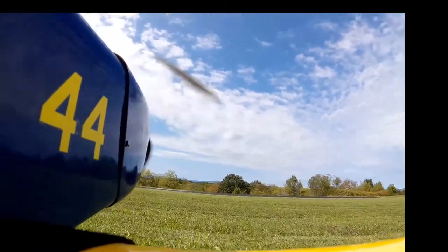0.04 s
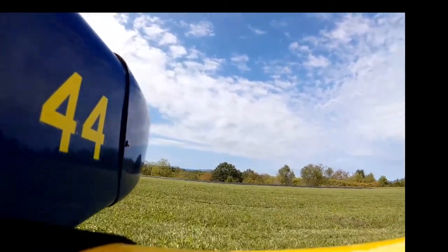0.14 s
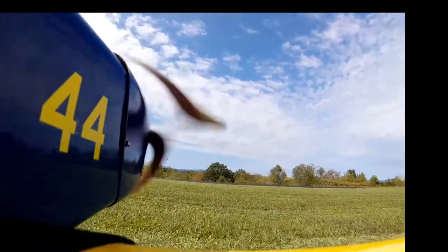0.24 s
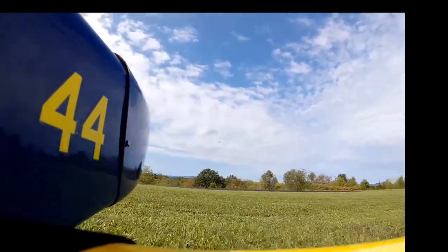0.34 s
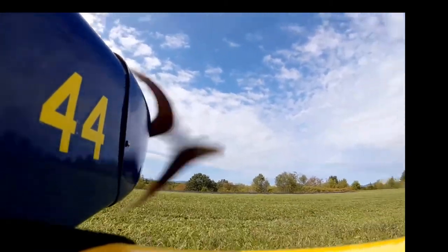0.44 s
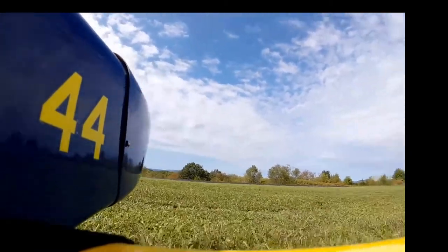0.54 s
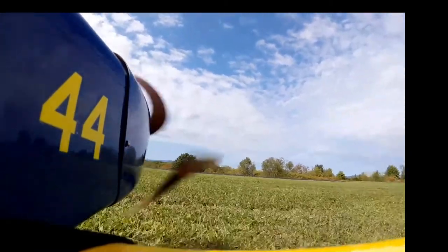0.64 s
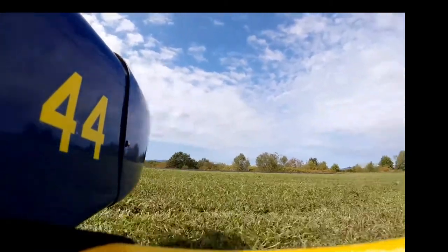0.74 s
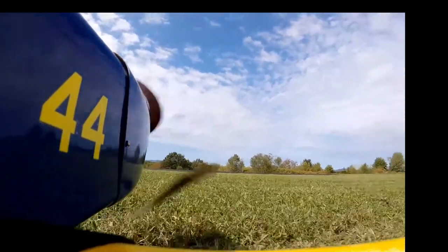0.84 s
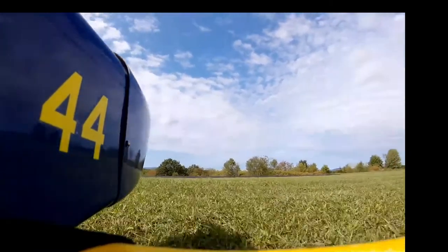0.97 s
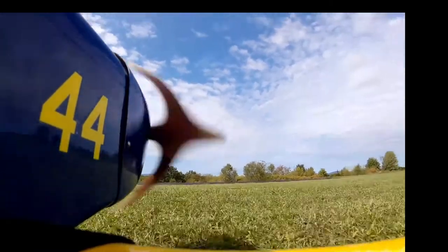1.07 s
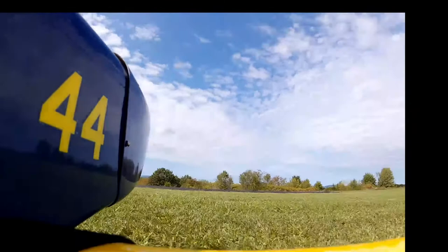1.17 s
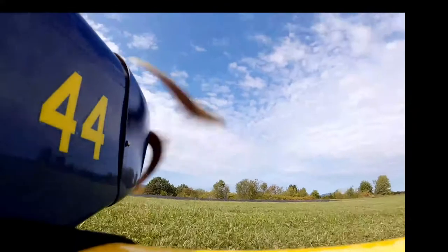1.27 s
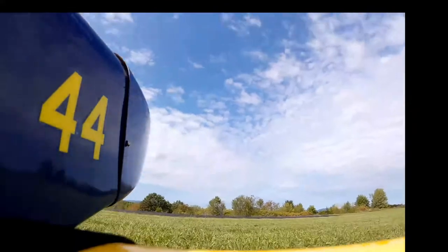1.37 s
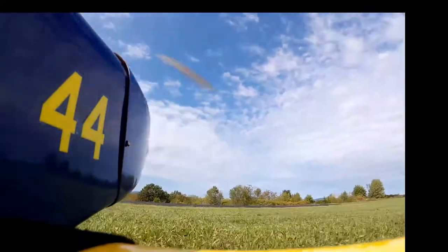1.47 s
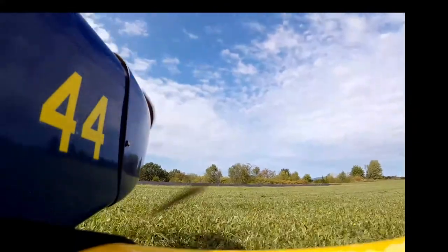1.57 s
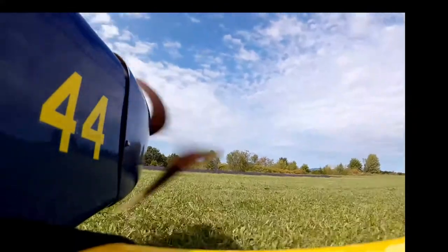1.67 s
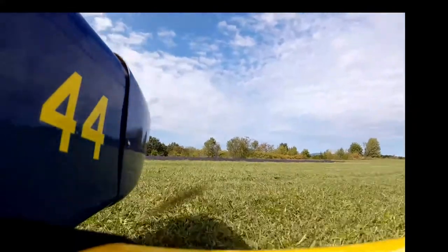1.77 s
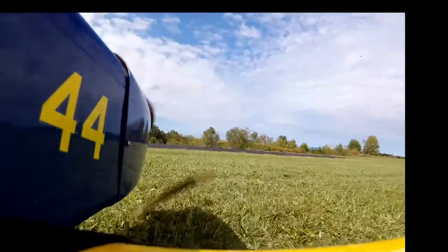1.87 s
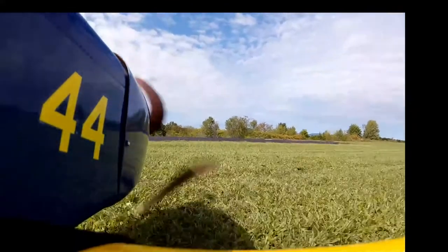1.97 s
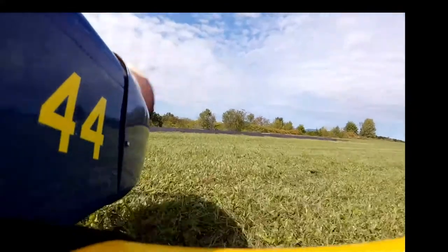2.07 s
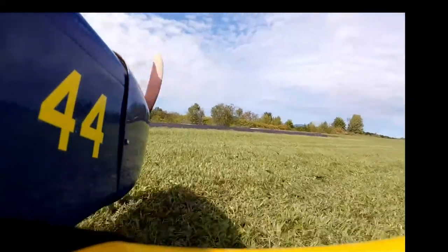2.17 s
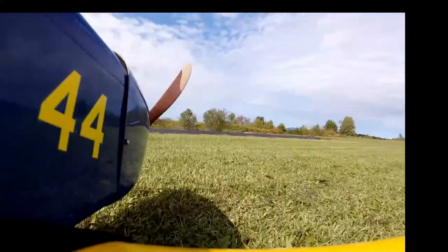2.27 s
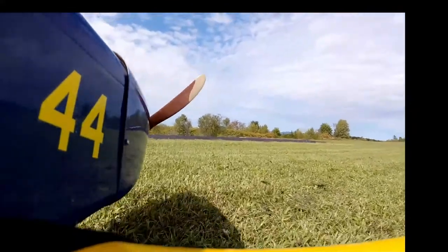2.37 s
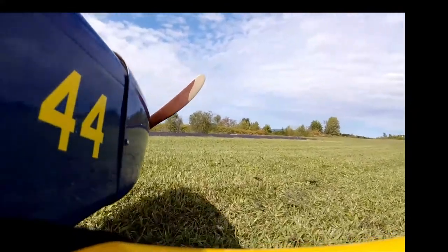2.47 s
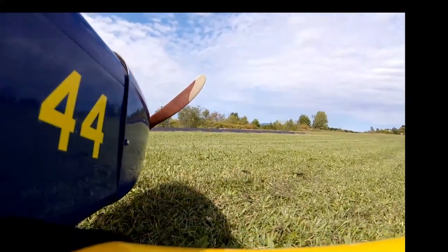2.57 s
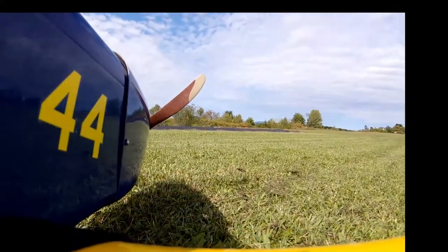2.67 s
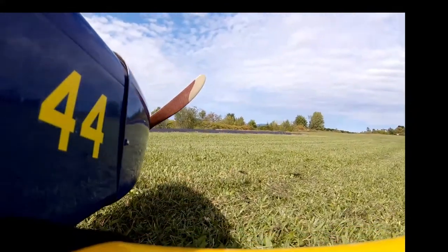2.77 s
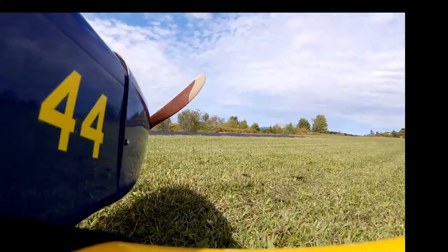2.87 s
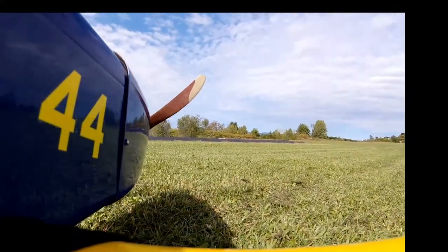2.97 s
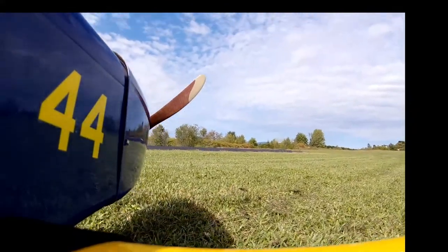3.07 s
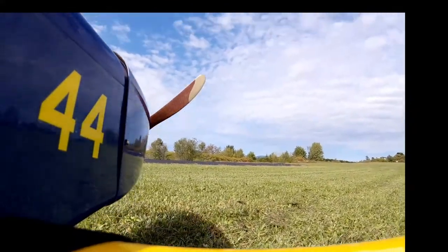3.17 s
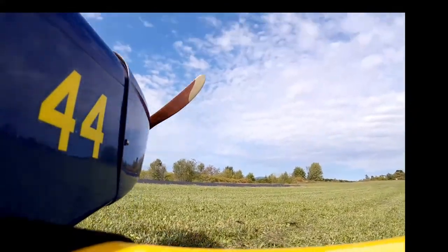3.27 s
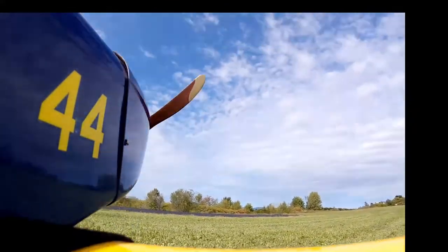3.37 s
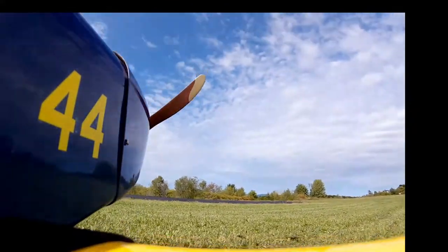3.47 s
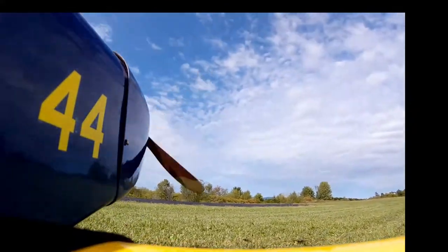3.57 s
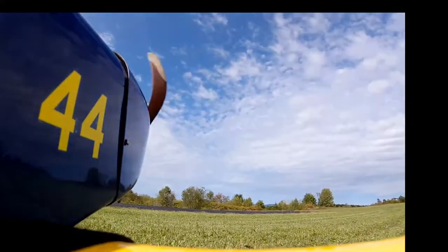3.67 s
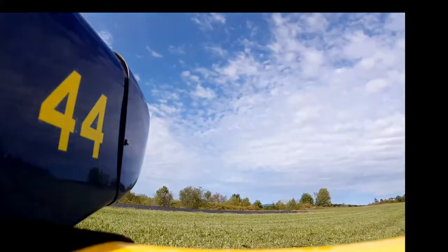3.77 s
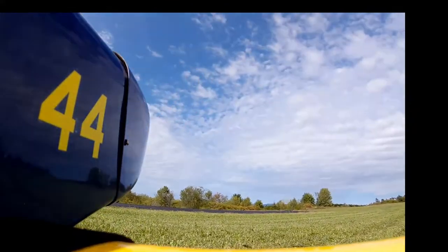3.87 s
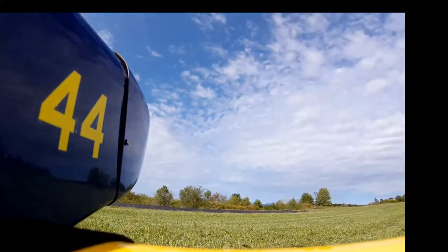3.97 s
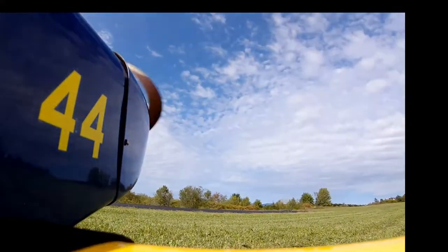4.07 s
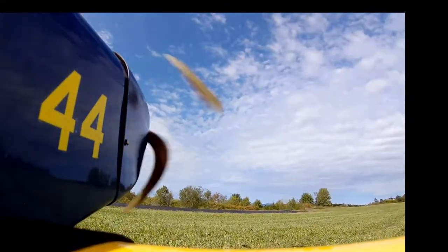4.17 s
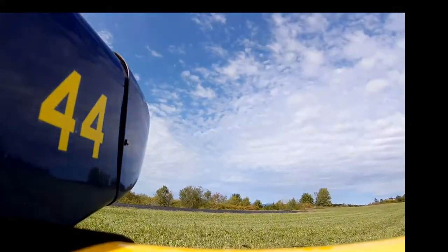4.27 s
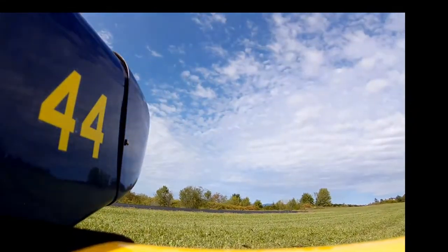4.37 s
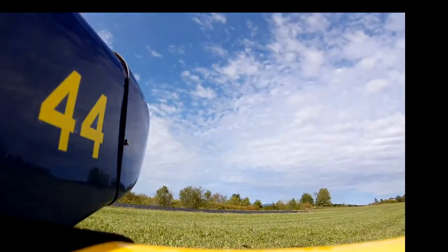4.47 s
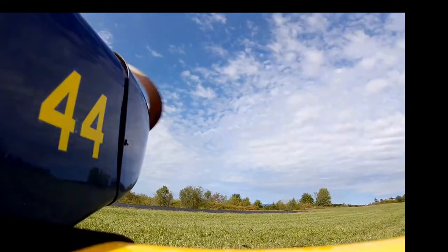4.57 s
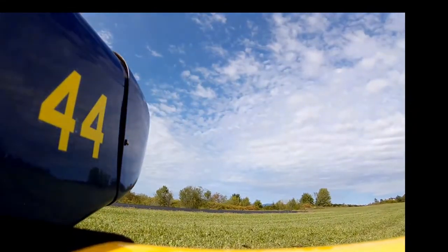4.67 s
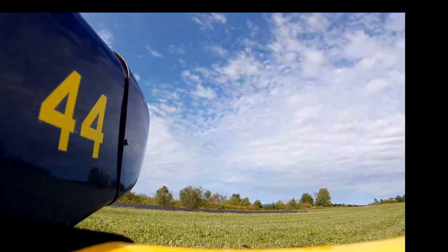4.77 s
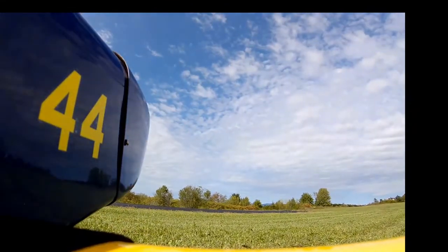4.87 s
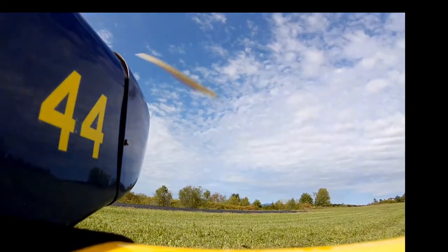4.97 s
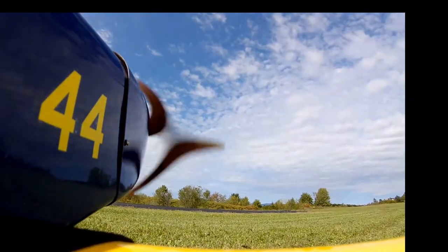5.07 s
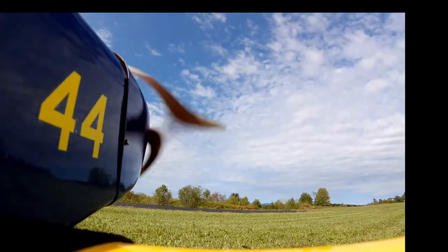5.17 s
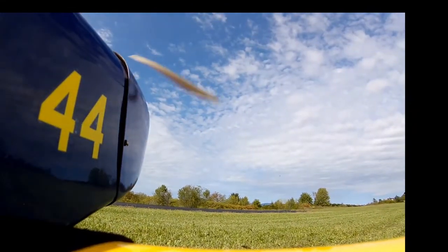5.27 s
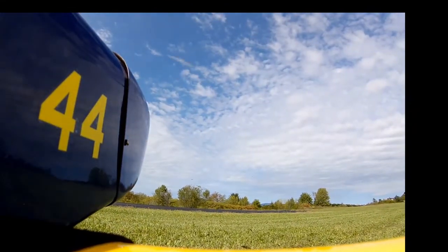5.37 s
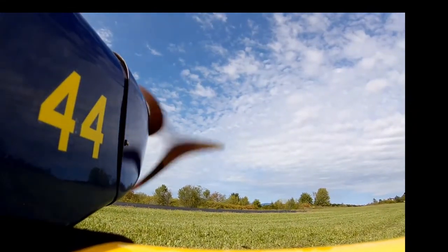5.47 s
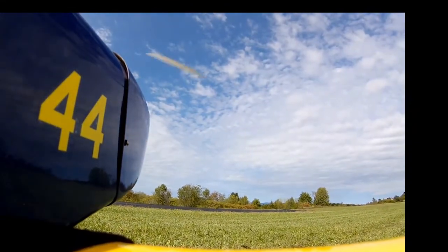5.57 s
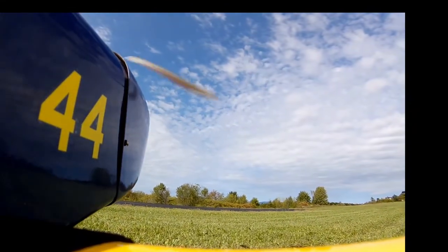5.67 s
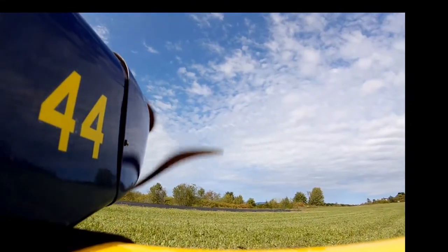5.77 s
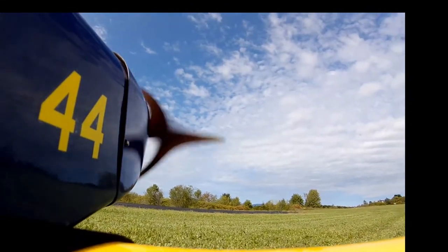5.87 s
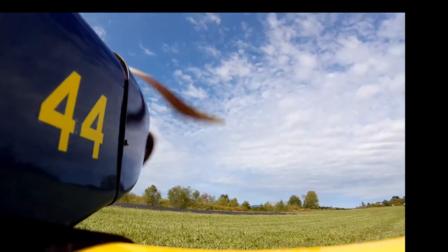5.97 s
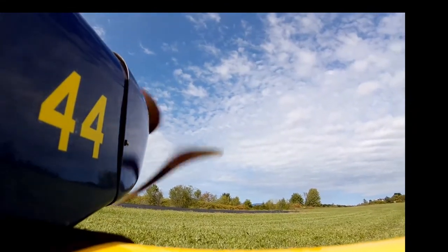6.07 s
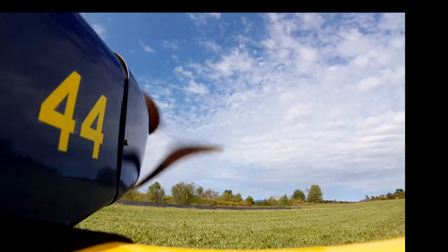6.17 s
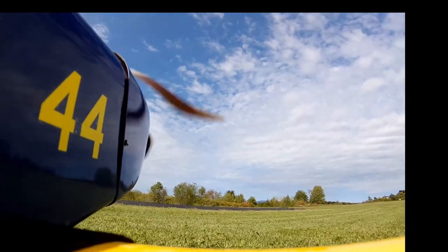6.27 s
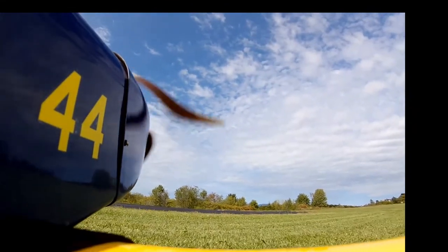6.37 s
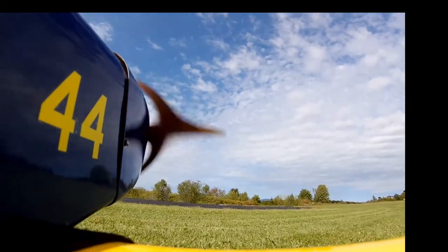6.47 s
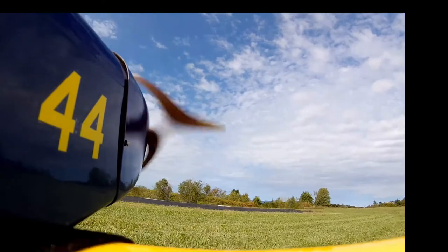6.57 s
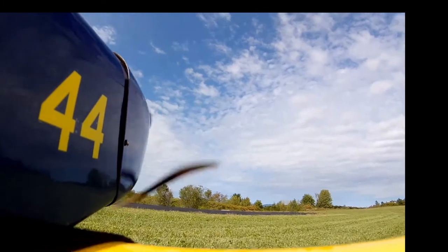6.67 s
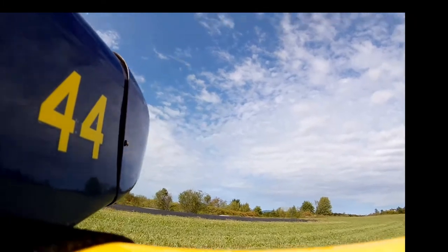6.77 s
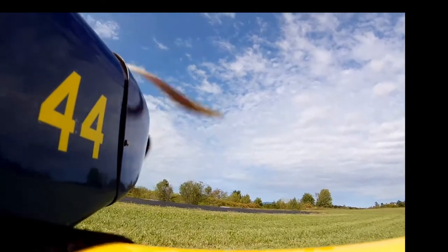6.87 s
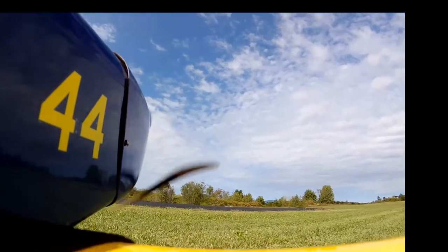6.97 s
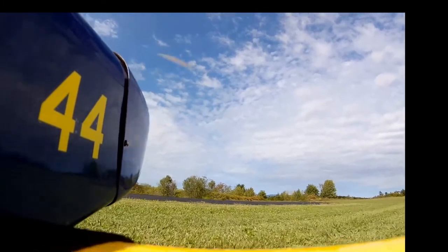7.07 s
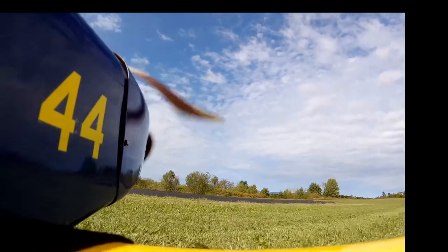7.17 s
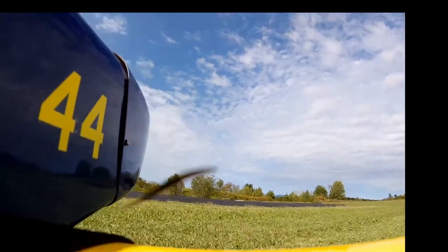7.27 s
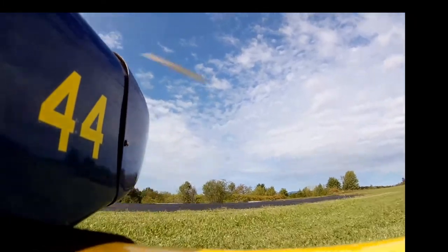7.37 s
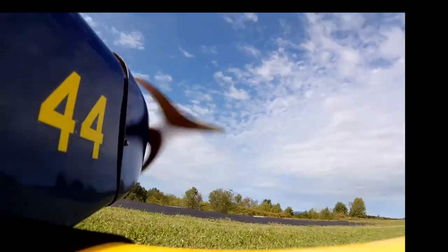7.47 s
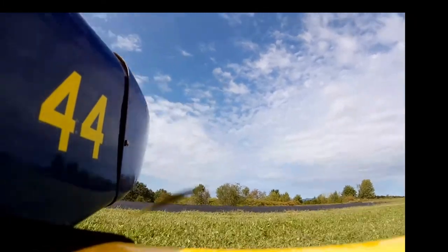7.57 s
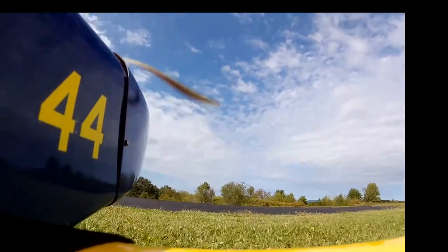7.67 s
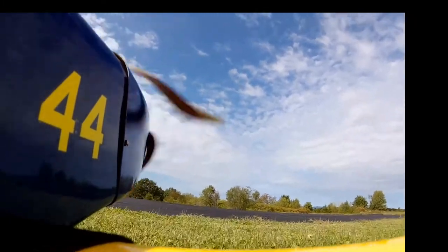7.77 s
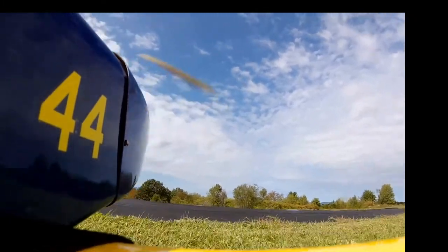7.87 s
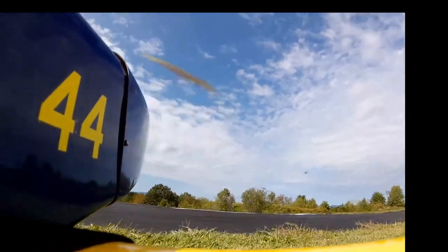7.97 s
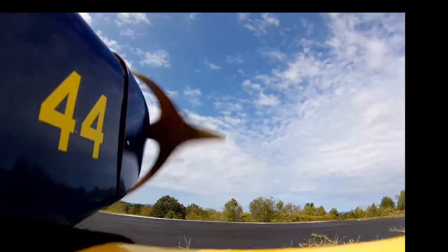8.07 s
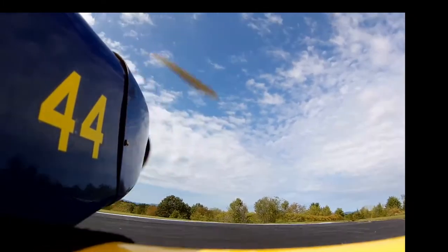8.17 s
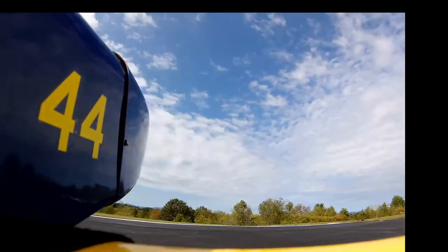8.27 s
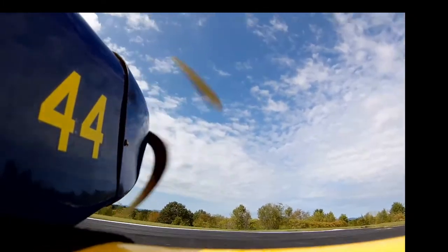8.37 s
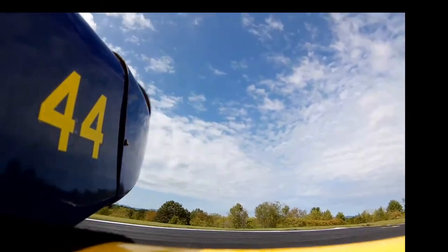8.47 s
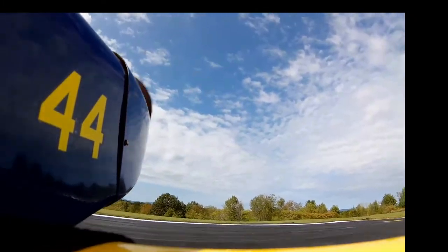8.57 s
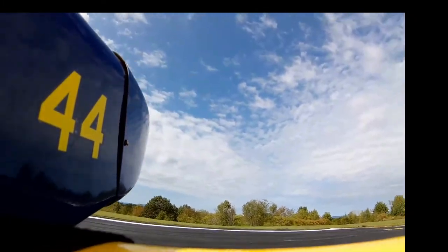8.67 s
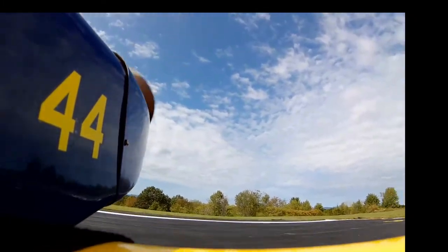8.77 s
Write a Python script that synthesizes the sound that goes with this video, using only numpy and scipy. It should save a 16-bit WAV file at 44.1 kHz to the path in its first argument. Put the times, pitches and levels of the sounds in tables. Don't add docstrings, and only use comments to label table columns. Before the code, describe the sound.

A microphone on a model airplane's wing is battered by rough propeller wash over a steady electric whine. After two seconds the motor stops, with a hollow fuselage boom and brief grass swishes. Near silence follows, then jerky knocks, a swiftly gliding whine and a much louder, buffeting rush that weakens at the end.

```python
import sys
import numpy as np
from scipy import signal
from scipy.io import wavfile
from scipy.ndimage import uniform_filter1d

SR = 44100
rng = np.random.default_rng(int(sys.argv[2]) if len(sys.argv) > 2 else 0)


def wav_out(sig):
    wavfile.write(sys.argv[1], SR, np.round(np.clip(np.atleast_2d(sig).T, -1, 1) * 32767).astype(np.int16))


def volts_from_db(level):
    exponent = np.asarray(level, float) / 20
    return 10 ** exponent


N = 389403

# time_s, level_db
WASH_RUNS = [
    [(0, -26.5), (.1, -22), (1.2, -22.5), (1.45, -27.5), (1.8, -21.5), (2.15, -25), (2.22, -44),
     (2.36, -62)],
    [(3.9, -53), (4.0, -37.5), (4.6, -37), (4.75, -29), (5.7, -17), (7.45, -16), (8.05, -19), (8.3, -26),
     (8.83, -36.5)],
]
# freq_hz, density_db
WASH_COLOUR = [(15, -85), (30, -51.5), (102, -26.5), (231, -6), (368, -0.5), (489, 0), (868, -4.5),
               (1510, -15), (2290, -25), (3400, -33), (4840, -46.5), (5700, -54.5), (6400, -65),
               (8000, -93)]
# freq_hz, level_db
CRACKLE_COLOUR = [(5500, -35.5), (6200, -3.5), (7000, 8.5), (8500, 8.5), (10500, -5), (12500, -16.5),
                  (16000, -35)]
# time_s, change_db, treble_change_db, length_s
GUSTS = [(.62, -1.5, -2.5, .1), (1.277, 1.5, 0, 0.042), (1.36, -4, -4, 0.021), (1.385, 5.5, 3, 0.019),
         (1.6, 3.5, 1, 0.063), (1.665, -6, -2.5, 0.031), (1.723, -0.5, 3, 0.045), (2.027, -4, 6.5, 0.046),
         (2.082, 7, 1.5, .03), (4.695, 0, 4, 0.047), (4.973, 2.5, 4, 0.026), (5.038, 2.5, 2.5, 0.027),
         (5.797, 0, 1.5, 0.032), (5.91, 2, 0.5, .05), (6.118, -3, -2, .1), (6.42, 3, 2.5, 0.047),
         (6.547, 0, 1.5, 0.053), (6.6, 5, -5.5, 0.017), (7.816, -3.5, -2.5, .04), (8.252, -3, 0, 0.052),
         (8.375, 4.5, 8, 0.067), (8.44, -3.5, -4, 0.024), (8.49, 3.5, 9, 0.016), (8.542, 0, -8, 0.015),
         (8.577, 3, 9, 0.025), (8.651, -1.5, -2, 0.027), (8.692, 6, 9.5, 0.019), (8.738, 0, 2, 0.036),
         (8.8, 6.5, 7, 0.047)]
WASH_TREBLE_DB, WASH_BASS_DB = -21, -23.5
TREBLE_SLOPE, BASS_SLOPE, COASTING_BASS_DB, FIZZ_SLOPE = 0.18, -0.3, -5, 0.61

# start_s, peak_db
BUFFETS = [(0.489, -24), (1.046, -15), (1.12, -17.5), (1.158, -7), (1.564, -12), (1.65, -14), (1.685, -7),
           (1.764, -17), (2.078, -3.5), (4.075, -17), (4.102, -19.5), (4.471, -20), (4.696, -15.5),
           (5.264, -14), (5.335, -8.5), (5.435, -13.5), (5.513, -5.5), (5.905, 0.5), (6.001, -3),
           (6.213, -3), (6.382, -11), (6.576, -5), (6.727, -10.5), (6.884, -1), (6.934, -2), (7.195, -10.5),
           (7.452, -11.5), (7.634, -9), (8.005, -8.5), (8.48, -15)]
TIP_DB, TIP_SLOPE = -26.5, .65

# time_s, order21_hz
TAXI = [
    (0, 1314),
    (1.6, 1314),
    (2.0, 1290),
]
# time_s, order21_hz
SPIN_UP = [(3.5, 70), (3.6, 225), (3.69, 355), (3.76, 405), (3.825, 450), (3.885, 815), (3.925, 935),
           (3.965, 992)]
# time_s, order21_hz
THROTTLE = [(4.2, 969), (4.55, 957), (4.7, 1190), (5.06, 1590), (5.42, 1610), (5.53, 1745), (5.89, 1925),
            (6.09, 1600), (6.25, 1810), (6.4, 1890), (6.6, 1752), (7.65, 1750), (7.85, 1590), (8.35, 1940),
            (8.5, 1730), (8.65, 1610), (8.83, 1510)]
INERTIA_S, STICK_S = .025, .07

# time_s, level_db
CURRENT_RUNS = [
    [(0, -3), (1.5, -1), (1.7, -8), (2.0, -11)],
    [(3.58, -22), (3.67, -0.5), (3.79, -4), (3.86, 5.5), (3.94, -1), (3.99, -7), (4.62, -1.5), (4.76, -5),
     (5.45, -0.5), (6.2, -0.5), (6.4, -0.5), (7.78, 0), (7.9, -22.5), (8.4, -21.5), (8.55, -6)],
]
WHINE_ORDERS = 21, 28, 36, 42, 84, 126
ORDER_DB = [-49, -52, -56.5, -39.5, -59.5, -71.5]
ORDER_FADE_DB = [-.14, 0, .7, 0.1, .3, .3]
ORDER_PULL_DB = [1.5, -0.5, 2, 1.5, 9.5, 7]
# freq_hz, level_db
MOUNT = [(250, -36), (450, -13), (850, -10.5), (1700, 2.5), (2150, -0.5), (3100, -30), (4300, -25),
         (6000, -48)]
SWITCHING_HZ = 8750

# freq_hz, width_hz, level_db
AIRFRAME = [(262, 19, -12.5), (416, 95, -9.5), (454, 29, 2), (690, 110, 1), (873, 8.3, 0.5),
            (1134, 49, -5.5), (1300, 17, -1), (1640, 140, -5.5), (2042, 210, -9), (3170, 43, -32.5)]
# peak_s, level_db, rise_s, fall_s
COGGING = [
    (3.372, -67, .005, 0.73),
    (3.5, -31, .004, .13),
    (3.57, -25, 0.019, .19),
    (3.855, -25, 0.046, 0.18),
]
# start_s, peak_db, relative_tick_db
KNOCKS = [(2.373, -32, -26), (2.518, -55.5, -11), (3.099, -72, -11), (3.299, -60, -12.5), (3.369, -47, -21),
          (3.392, -42, -10), (3.421, -50, -8), (3.45, -49, -17), (3.497, -26, -32), (3.518, -32, -39),
          (3.565, -30, -33), (3.578, -40, -37), (3.769, -38.5, -29)]
STEPS_PER_S, CATCH_S = 520, 3.97

# peak_s, level_db, rise_s, fall_s
SCRATCH = [(3.305, -74.5, .08, 0.076), (3.372, -62, .005, .025), (3.46, -57, 0.032, .05),
           (3.57, -73, .015, .06), (3.77, -65, 0.011, .03), (3.856, -48, 0.064, 0.19)]
# freq_hz, level_db
SCRATCH_COLOUR = [(1200, -39), (2000, 14), (2500, 2.5), (3000, 0), (3800, -11), (4600, -25.5), (5400, -34),
                  (6500, -55), (9000, -93)]

# peak_s, level_db, rise_s, fall_s
BOOM = [(1.768, -23.5, .04, .065), (1.892, -19.5, .08, .3), (2.1, -8.5, .045, 0.076),
        (2.28, -32.5, .08, .04), (2.4, -52, 0.07, .04), (8.55, -39, .03, .1), (8.7, -25.5, .09, .045),
        (8.81, -38, .07, .1)]
BOOM_HZ, BOOM_WIDTH_HZ = 393.3, 40

# peak_s, level_db, rise_s, fall_s, relative_blades_db
SWISHES = [(2.01, -46, 0.039, .1, -3.5), (2.084, -30, 0.031, 0.05, -12.5), (2.132, -34, 0.025, 0.043, -9),
           (2.28, -55.5, 0.14, 0.094, -11.5), (2.405, -48.5, 0.047, 0.062, -24),
           (2.56, -69, 0.035, 0.12, 0.5), (2.655, -49.5, 0.11, 0.047, -19)]
# freq_hz, density_db
STEMS_COLOUR = [(150, -47.5), (400, 2), (700, -6), (1200, -6.5), (1900, 3), (2300, -3.5), (3000, -4),
                (3600, -14.5), (5000, -47.5), (6500, -64), (10000, -100)]
# freq_hz, level_db
BLADES_COLOUR = [(2800, -42.5), (3600, 3), (4400, -6), (5300, -11.5), (6300, -28), (8500, -33),
                 (12000, -46.5)]

# start_s, peak_db, pitch_hz, length_s
CHIRPS = [(.027, -55, 7280, 0.0079), (.128, -56, 7250, .018), (0.195, -54, 7280, .028),
          (.372, -66, 7150, .01), (0.466, -50, 7170, 0.039), (0.572, -51, 7230, 0.021),
          (0.72, -56, 7130, .035), (1.102, -54.5, 7180, 0.02), (1.495, -54, 7220, .024),
          (6.048, -62, 7300, 0.068), (6.41, -71, 7140, .03), (6.668, -78, 7250, .02),
          (6.993, -58, 7160, 0.022), (7.57, -56, 7160, .022), (8.585, -53, 7230, 0.039),
          (8.702, -57, 7160, 0.027)]
# start_s, peak_db, pitch_hz, length_s
SERVO_HUM = (2.86, -66, 632, .18)

# peak_s, level_db, rise_s, fall_s
FIELD = [
    (2.2, -43, .01, 0.23),
    (2.64, -69.5, 0.13, 0.12),
    (3.46, -55, 0.15, .8),
]
# freq_hz, density_db
FIELD_COLOUR = [(15, -67.5), (25, -35), (92, -21.5), (156, -14), (270, -4), (535, 0.5), (624, 0), (712, -2),
                (1230, -12), (1410, -14.5), (4840, -31.5), (6290, -64.5), (10600, -120)]
FIELD_DB, HISS_DB = -71.5, -89.5

# freq_hz, width_hz
NOTCHES = [
    (699, 42),
    (6480, 650),
    (7500, 450),
]


def wash():
    gust_db, ticks = eddy_flicker()
    white = volts_from_db(gust_db) * rng.standard_normal(N)
    eddies = evened(coloured(np.r_[white[-4096:], white], WASH_COLOUR)[4096:])
    treble, bass = above(eddies, 2045), eddies - above(eddies, 199)
    middle = eddies - treble - bass
    soft_ticks = uniform_filter1d(uniform_filter1d(np.minimum(ticks, 4), size=30), size=24)
    sharp = evened(treble * volts_from_db(0.1 * gust_db + drift(3) + 0.45 * soft_ticks))
    fizz = above(sharp, 3900)
    crackle = evened(coloured(volts_from_db(1.9 * gust_db) * rng.standard_normal(N), CRACKLE_COLOUR))
    rumble = evened(bass * volts_from_db(2.5 * drift(8.9)))

    out, t = np.zeros(N), np.arange(N) / SR
    gusts_db, bright_db = sum(np.outer(db, np.exp(-((t - s) / length) ** 2)) for s, *db, length in GUSTS)
    coasting = uniform_filter1d(1. * (shaft_hz() == 0), 4000)
    for rows in WASH_RUNS:
        part, (db,) = played(rows)
        lost_fizz = 1 - volts_from_db(FIZZ_SLOPE * np.clip(db + 23, -14, 0))
        crackle_db = -33.5 + 0.6 * (db + 14)
        top = sharp[part] - lost_fizz * fizz[part] + volts_from_db(crackle_db) * crackle[part]
        treble_db = WASH_TREBLE_DB + TREBLE_SLOPE * np.clip(db + 31, -12, 0) + bright_db[part]
        bass_db = WASH_BASS_DB + BASS_SLOPE * np.clip(db + 22.5, -15, 8)
        bass_db = bass_db + COASTING_BASS_DB * coasting[part]
        body = volts_from_db(gusts_db[part]) * middle[part]
        out[part] = volts_from_db(db) * (body + volts_from_db(treble_db + 1) * top + volts_from_db(bass_db + 6) * rumble[part])
    return out


def eddy_flicker():
    arrivals = (rng.random(N) < 90 / SR) * rng.exponential(1, N)
    bursts = np.sqrt(signal.lfilter([1], [1, -np.exp(-1 / (0.00093 * SR))], arrivals))
    ticks = evened(bursts - bursts.mean())
    gust_db = drift(42) + 0.52 * np.minimum(ticks, 4) + drift(180) + 2 * drift(300)
    gust_db = gust_db + np.cos(2 * np.pi * np.cumsum(shaft_hz()) / SR)
    return np.minimum(gust_db, 9), ticks


def buffets():
    t, out = np.arange(1500) / SR, np.zeros(N + 1500)
    for (s, db), white in zip(BUFFETS, rng.standard_normal((len(BUFFETS), 1500))):
        puff = coloured(white * np.exp(-t / .004), WASH_COLOUR)
        puff = signal.lfilter(*signal.butter(2, 150, "high", fs=SR), puff)
        tip = above(coloured(white * np.exp(-t / 0.0019), WASH_COLOUR), 2500)
        tip = tip * np.minimum(t / .0005, 1)
        tip_gain = volts_from_db(TIP_DB + TIP_SLOPE * db)
        out[round(s * SR):][:1500] += volts_from_db(db - 5.5) * (puff / abs(puff).max() + tip_gain * tip / abs(tip).max())
    return out[:N]


def whine():
    out = np.zeros(N)
    flutter = volts_from_db(1.5 * drift(50) + 1.5 * drift(5))
    steady = shaft_hz()
    shaft = steady * (1 + .0015 * drift(30))
    rough = np.clip(drift(40), -3, 1.5)
    mount_hz, mount_db = np.transpose(MOUNT)
    for rows, run in zip(CURRENT_RUNS, (TAXI, THROTTLE)):
        tail = [(run[-1][0], rows[-1][1] - 4)] * (run[-1][0] > rows[-1][0])
        part, (drive_db,) = played(rows + tail)
        turns = shaft[part]
        angle = 2 * np.pi * np.cumsum(turns) / SR
        pull = np.clip(np.gradient(steady)[part] * SR / 70, 0, 1)
        for order, db, fade_db, pull_db in zip(WHINE_ORDERS, ORDER_DB, ORDER_FADE_DB, ORDER_PULL_DB):
            hz = order * turns
            db = db + drive_db + pull_db * pull + np.interp(np.log(hz + 1), np.log(mount_hz), mount_db)
            db = db - fade_db * np.maximum(turns - 47, 0)
            swell = sum(volts_from_db(d) / (1 + (2 * (hz - mode) / (2 * w)) ** 2) for mode, w, d in AIRFRAME)
            out[part] += np.sqrt(2) * volts_from_db(db) * (1 + swell) * np.sin(order * angle)
        beat = np.sin(2 * np.pi * SWITCHING_HZ * np.arange(len(angle)) / SR - 84 * angle)
        slow = (turns > 44.5) & (turns < 55)
        out[part] += volts_from_db(drive_db - 82) * slow * beat
        out[part] *= signal.windows.tukey(len(angle), .004) * volts_from_db(3 * pull * rough[part])
    return out * flutter


def shaft_hz():
    hz = np.zeros(N)
    for rows in TAXI, SPIN_UP + THROTTLE:
        part, (order21_hz,) = played(rows)
        quick = uniform_filter1d(order21_hz, round(INERTIA_S * SR), mode="nearest")
        slow = uniform_filter1d(order21_hz, round(STICK_S * SR), mode="nearest")
        spinning_up = np.arange(N)[part] < (THROTTLE[0][0] - .1) * SR
        hz[part] = np.where(spinning_up, quick, slow) / 21
    return hz


def cogging():
    chance, size = rng.random(N), rng.standard_normal(N)
    jerks = swells(COGGING) * np.clip((CATCH_S - np.arange(N) / SR) / .02, 0, 1)
    steps = airframe((chance < STEPS_PER_S / SR) * size + 0.029 * size)
    dull = signal.lfilter(*signal.butter(4, 2500, fs=SR), steps)
    top_mode = signal.lfilter(*signal.iirpeak(AIRFRAME[-1][0], 40, SR), steps)
    out = jerks * volts_from_db(-7.5) * evened(dull + top_mode)
    for (s, peak_db, tick_db), white in zip(KNOCKS, rng.standard_normal((len(KNOCKS), 4000))):
        blow = white * np.exp(-np.arange(4000) / (0.0019 * SR))
        ring, tick = airframe(blow), coloured(blow, SCRATCH_COLOUR)
        knock = ring / abs(ring).max() + volts_from_db(tick_db) * tick / abs(tick).max()
        out[round(s * SR):][:4000] += volts_from_db(peak_db - 1) * knock
    return out


def airframe(x):
    out = 0
    for k, (hz, width, db) in enumerate(AIRFRAME):
        b, a = signal.iirpeak(hz, hz / (0.82 * width), SR)
        out = out + (-1) ** k * volts_from_db(db) * signal.lfilter(b, a, x)
    return signal.sosfilt(signal.butter(3, [240, 3300], "band", fs=SR, output="sos"), out)


def scratch():
    return swells(SCRATCH) * noise(SCRATCH_COLOUR, 5.8)


def fuselage():
    b, a = signal.iirpeak(BOOM_HZ, BOOM_HZ / BOOM_WIDTH_HZ, SR)
    boom = signal.lfilter(b, a, signal.lfilter(b, a, rng.standard_normal(N)))
    return volts_from_db(-6) * swells(BOOM, 1.3) * evened(boom)


def grass():
    stems, blades = noise(STEMS_COLOUR, 2.2), noise(BLADES_COLOUR, 2.5)
    thin = [(s, db + blades_db, rise, fall) for s, db, rise, fall, blades_db in SWISHES]
    return swells([row[:4] for row in SWISHES], 1.6) * stems + swells(thin, 1.6) * blades


def servos():
    out, wobble = np.zeros(N), drift(80)
    for s, db, hz, length in CHIRPS + [SERVO_HUM]:
        at = np.arange(round(s * SR), round((s + length) * SR))
        pitch_hz = hz + .008 * hz * wobble[at]
        tone = np.sin(2 * np.pi * np.cumsum(pitch_hz) / SR) * volts_from_db(1.6 * wobble[at + 999])
        out[at] += volts_from_db(db - 5) * tone * signal.windows.tukey(len(at), .6)
    return out


def field():
    return np.hypot(volts_from_db(FIELD_DB), swells(FIELD)) * noise(FIELD_COLOUR, 1.8)


def evened(x):
    return x / np.sqrt(np.mean(x ** 2) + 1e-20)


def played(rows):
    s, *columns = np.transpose(rows)
    at = np.arange(round(s[0] * SR), min(round(s[-1] * SR), N))
    return slice(at[0], at[-1] + 1), [np.interp(at / SR, s, c) for c in columns]


def coloured(x, points):
    f, db = np.transpose(points)
    hz = abs(np.fft.fftfreq(8192, 1 / SR))
    gain_db = np.maximum(np.interp(np.log(hz + 1), np.log(f + 1), db), -110)
    log_gain = np.log(volts_from_db(gain_db))
    taps = np.fft.ifft(np.exp(np.conj(signal.hilbert(log_gain)))).real[:4096]
    return signal.oaconvolve(x, taps)[:len(x)]


def above(x, hz):
    return signal.sosfiltfilt(signal.butter(2, hz, "high", fs=SR, output="sos"), x)


def drift(hz):
    return evened(signal.lfilter(*signal.butter(2, hz, fs=SR), rng.standard_normal(N)))


def noise(colour, grain_db):
    return evened(coloured(volts_from_db(grain_db * drift(150)) * rng.standard_normal(N), colour))


def swells(rows, bend=1):
    t = np.arange(0, N + 20, 20) / SR
    power = 0
    for s, db, rise, fall in rows:
        away = np.maximum((s - t) / rise, (t - s) / fall)
        power = power + volts_from_db(2 * (db - 20 * away ** bend))
    return np.interp(np.arange(N) / SR, t, np.sqrt(power))


def scene():
    air = wash() + buffets()
    motor = whine() + cogging() + scratch()
    ground = fuselage() + grass()
    return (air + motor + ground + servos() + field())[None]


def band_limit(x):
    return signal.sosfilt(signal.butter(12, 15750, fs=SR, output="sos"), x)


def record(dry):
    mix = dry / (1 + abs(dry / .8) ** 4) ** .25
    for hz, width in NOTCHES:
        mix = signal.lfilter(*signal.iirnotch(hz, hz / width, SR), mix)
    mix = mix + volts_from_db(HISS_DB) * rng.standard_normal(mix.shape)
    return band_limit(mix)


dry = scene()
out = record(dry)
wav_out(out)
```